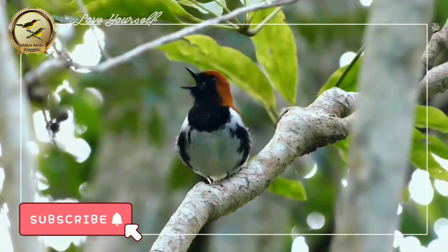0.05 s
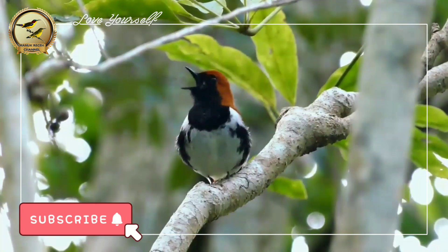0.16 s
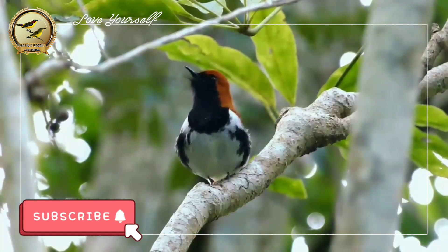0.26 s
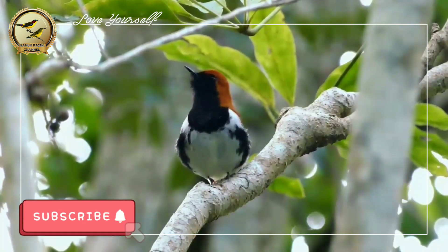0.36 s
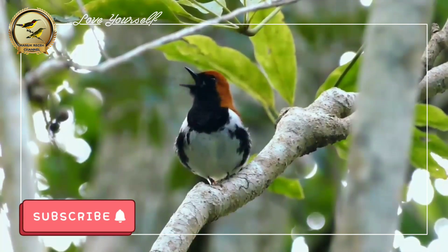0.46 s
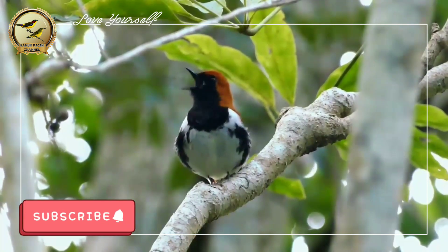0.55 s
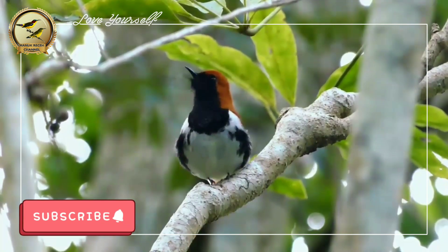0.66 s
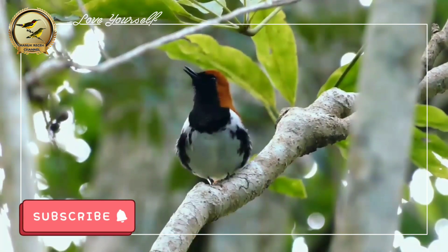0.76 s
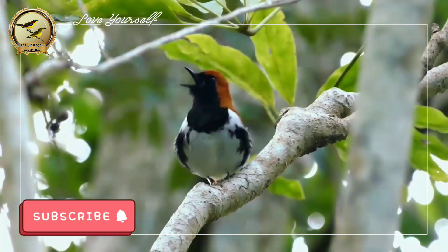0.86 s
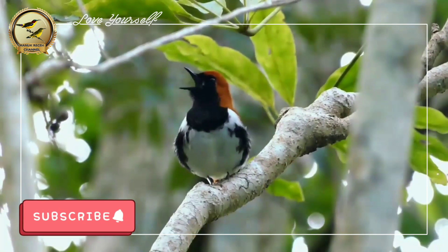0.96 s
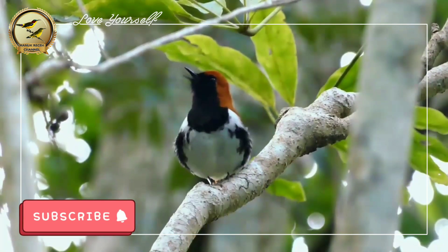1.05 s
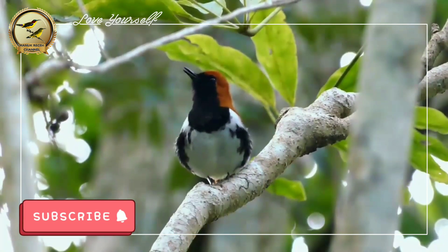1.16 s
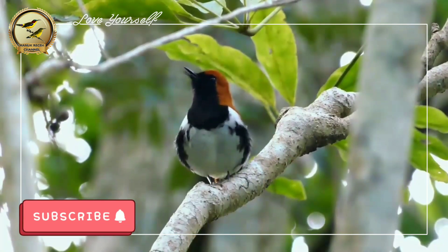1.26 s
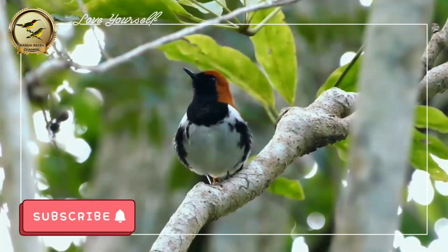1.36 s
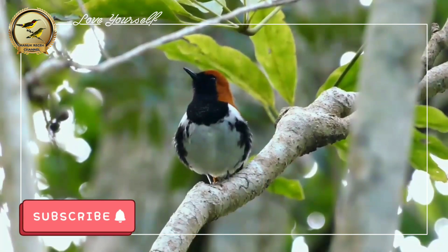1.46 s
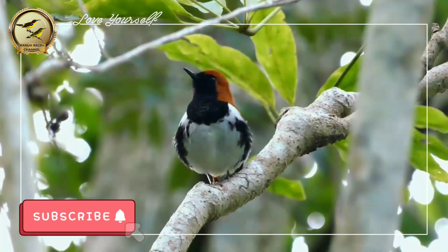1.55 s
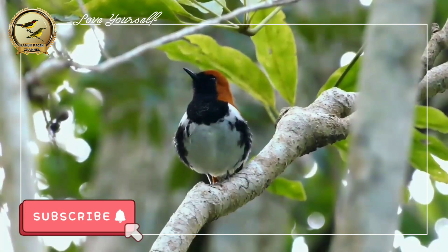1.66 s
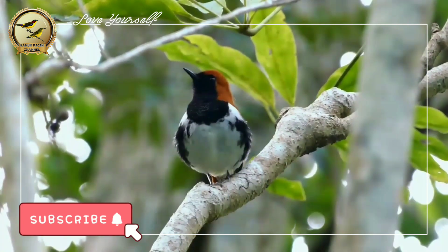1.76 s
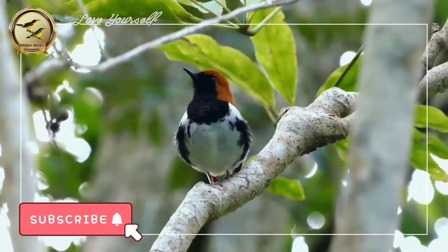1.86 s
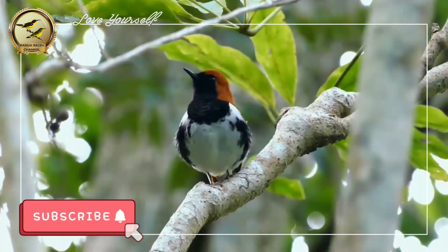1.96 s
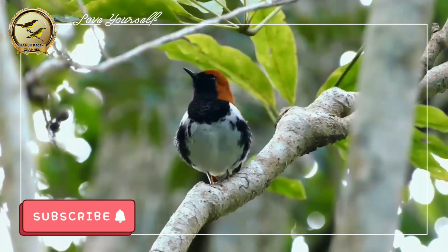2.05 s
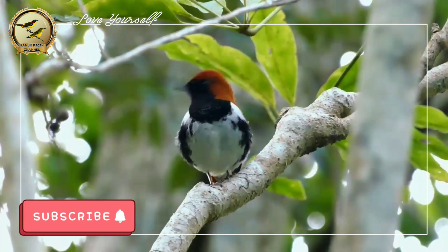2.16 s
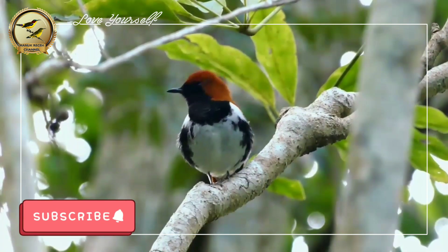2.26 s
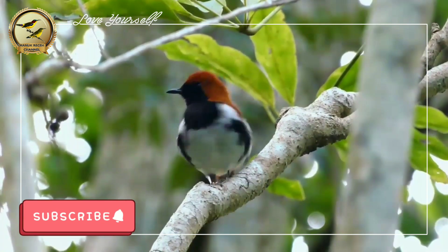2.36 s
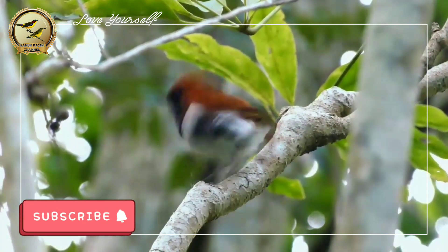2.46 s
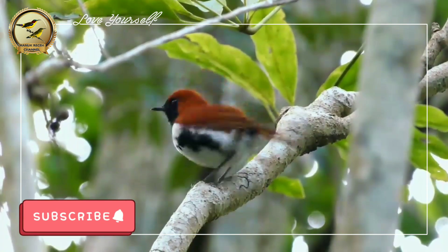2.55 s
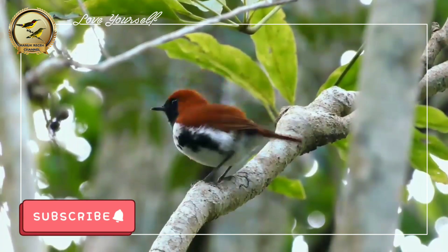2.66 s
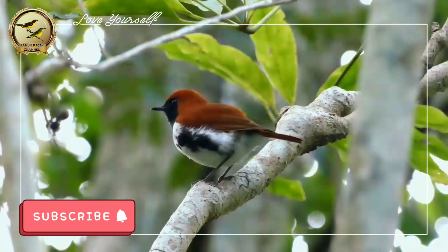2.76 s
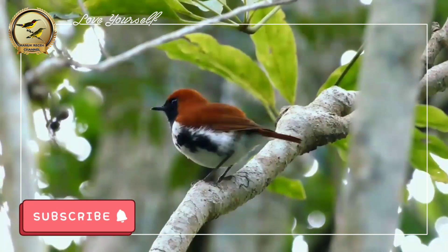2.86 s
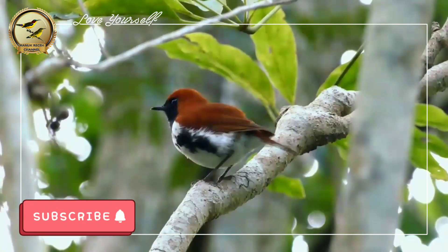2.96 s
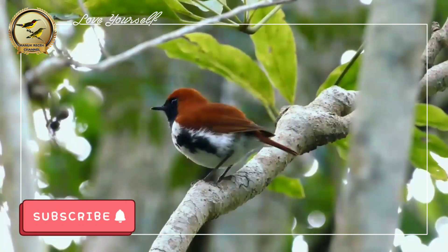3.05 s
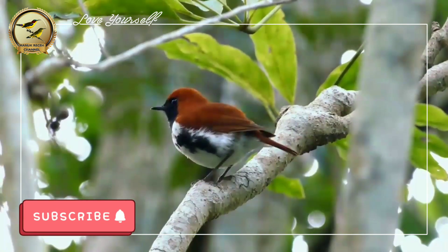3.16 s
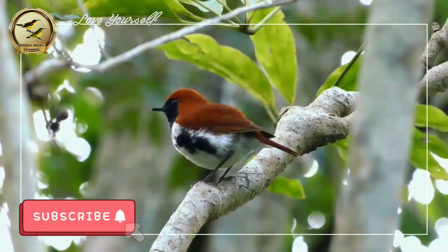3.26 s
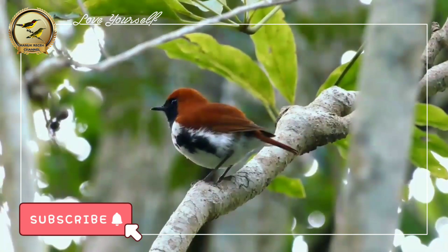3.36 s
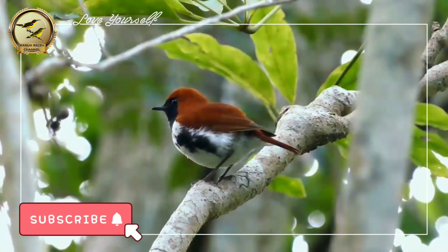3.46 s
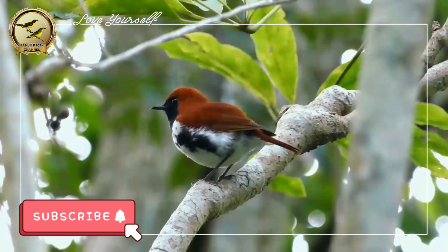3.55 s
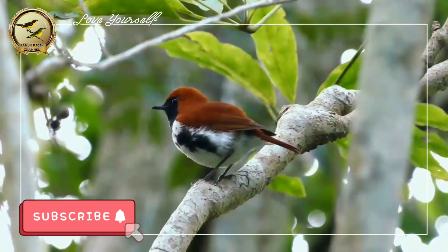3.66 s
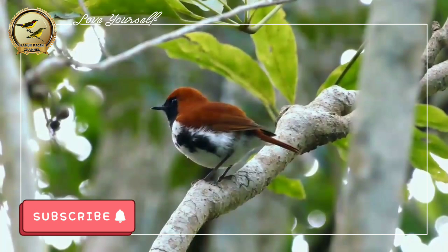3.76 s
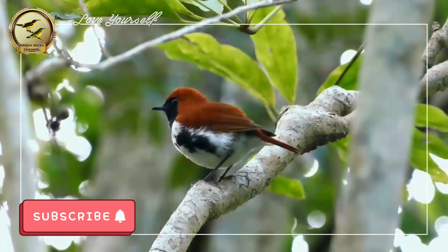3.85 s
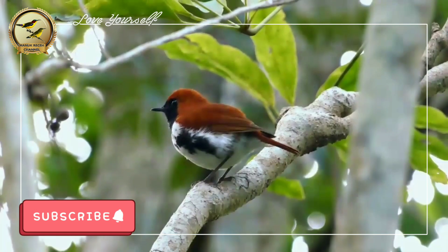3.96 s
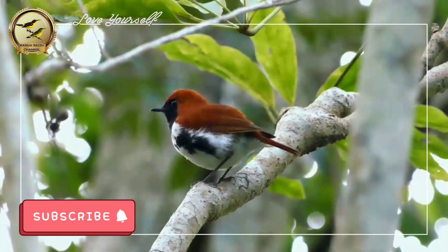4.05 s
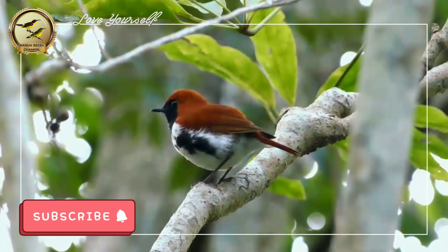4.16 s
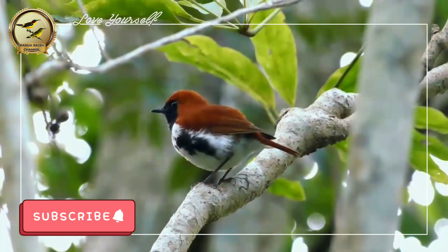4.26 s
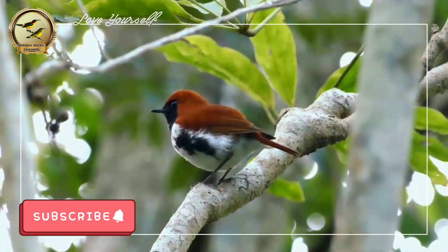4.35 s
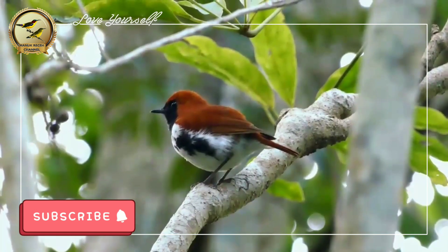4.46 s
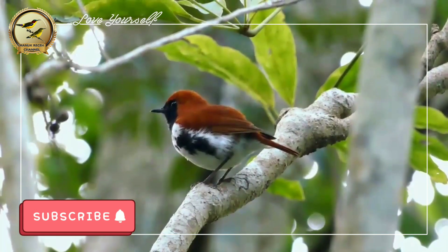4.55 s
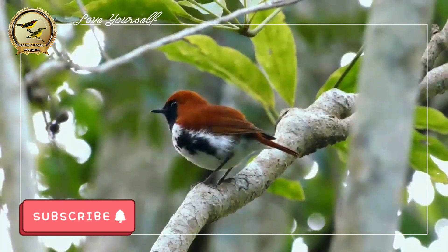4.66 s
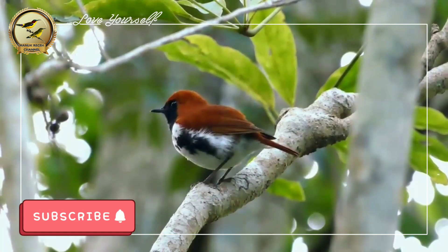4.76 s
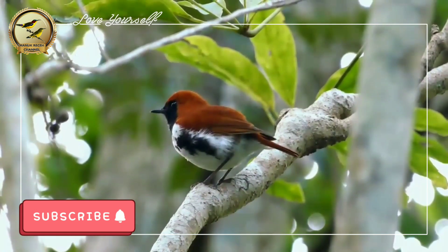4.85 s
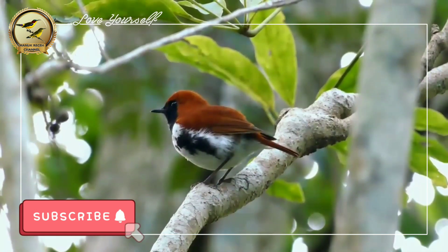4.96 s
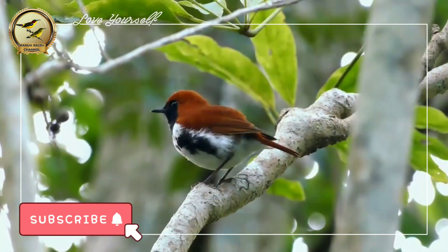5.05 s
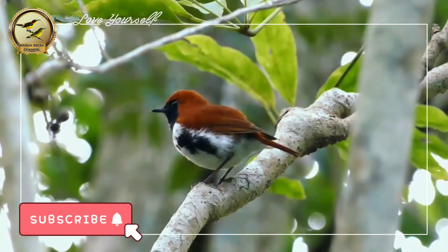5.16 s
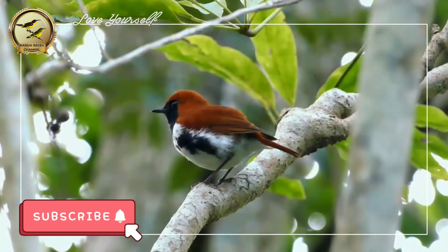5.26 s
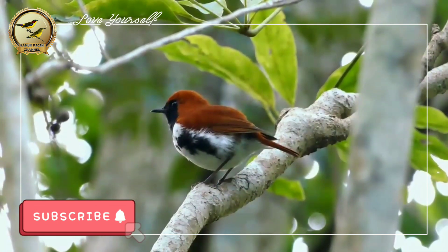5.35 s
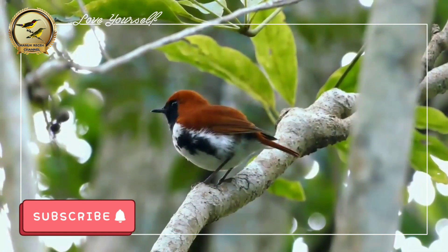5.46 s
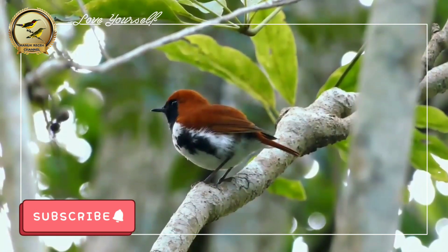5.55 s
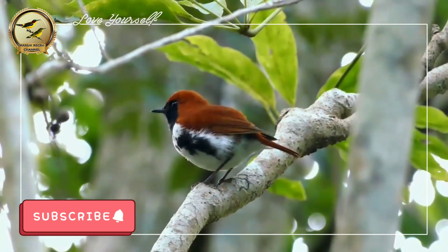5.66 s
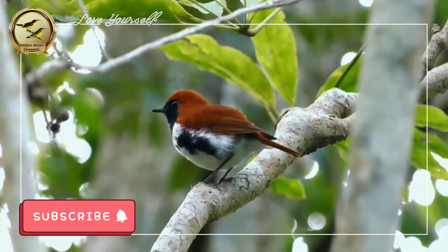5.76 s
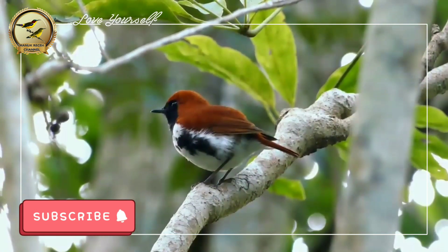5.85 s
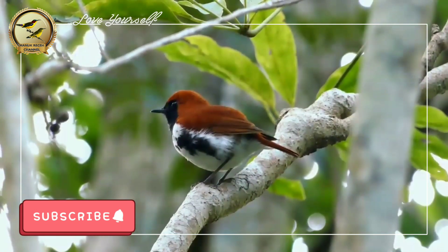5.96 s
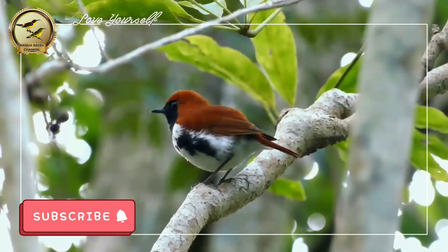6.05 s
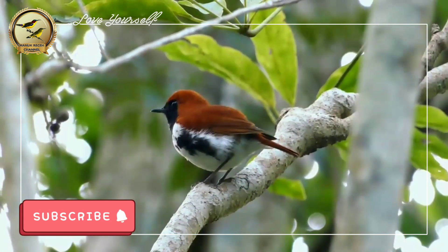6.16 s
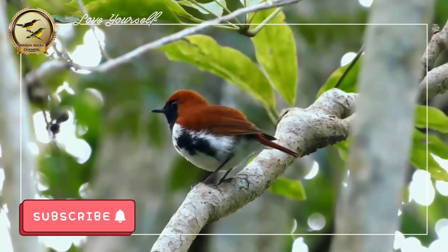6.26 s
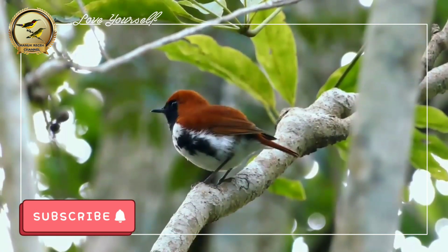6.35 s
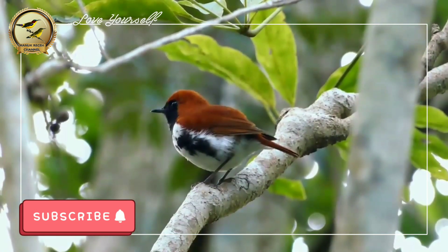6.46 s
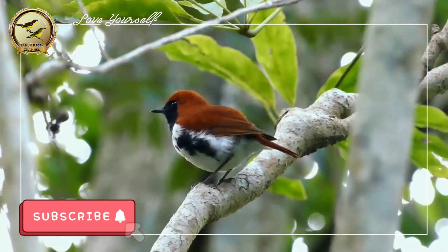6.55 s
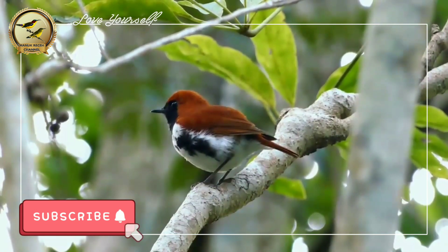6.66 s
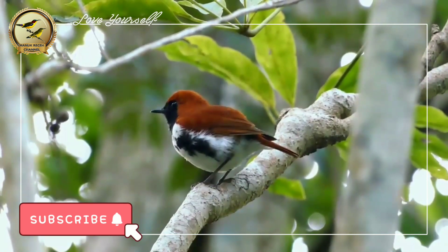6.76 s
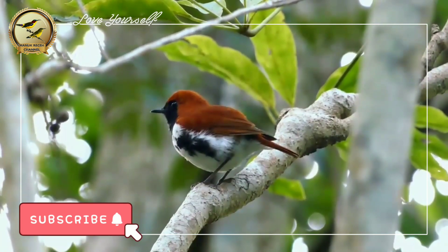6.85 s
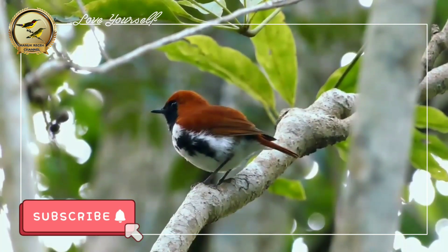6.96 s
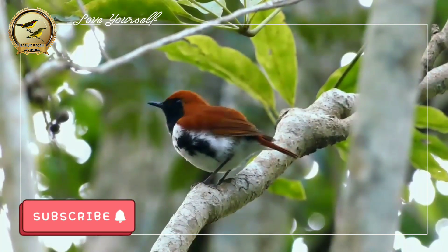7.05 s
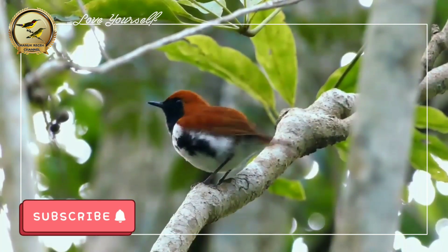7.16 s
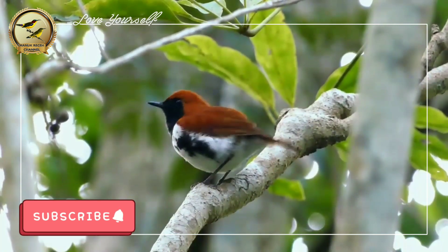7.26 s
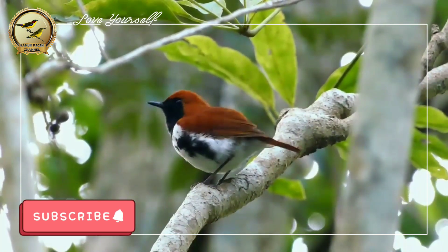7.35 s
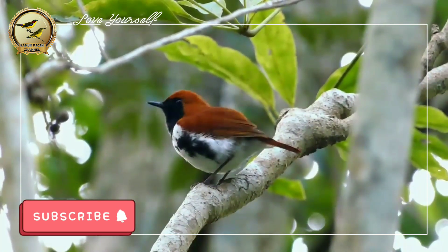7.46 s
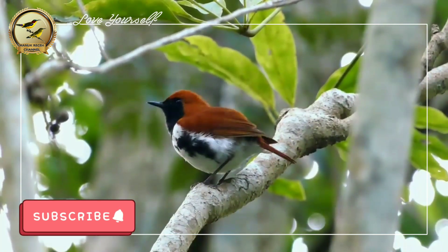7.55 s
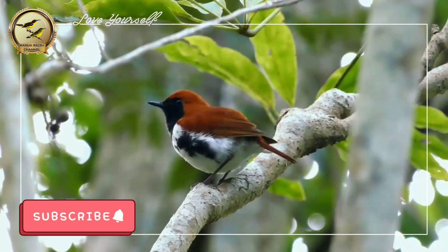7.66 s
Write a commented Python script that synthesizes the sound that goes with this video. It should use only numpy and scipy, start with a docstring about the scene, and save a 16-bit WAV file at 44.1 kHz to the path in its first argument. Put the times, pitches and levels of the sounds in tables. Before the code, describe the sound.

A close songbird sings a loud, rapid run of whistles, buzzes and trills, then a fainter bird answers through quiet forest with ticking twigs.

```python
"""A robin sings close to a stereo pair of microphones in a forest: an opening whistle and trill, then a high
whistle, a buzz, a lower whistle and a trill, three times over. A second bird answers from farther off,
blurred by the trees. Both voices are warbling tones with overtones and rasp, plus scattered echoes.
Twigs tick as cracks of noise with a woody ring; leaves rustle as crackling noise swells nearby.
Behind them lie soft forest air, made of three bands of noise, and a faint distant drone of wandering tones."""
import sys
import numpy as np
from scipy import signal
from scipy.fft import rfft, irfft, next_fast_len
from scipy.io import wavfile
from scipy.ndimage import uniform_filter1d, map_coordinates

SR = 44100
rng = np.random.default_rng(int(sys.argv[2]) if len(sys.argv) > 2 else 0)


def put_to_file(sound):
    """Save the sound as 16-bit audio at rate SR, in the file named by the first command-line argument."""
    columns = np.atleast_2d(sound).T  # one column per channel
    safe = np.clip(columns, -1, 1)
    whole_steps = np.round(safe * 32767)
    wavfile.write(sys.argv[1], SR, whole_steps.astype(np.int16))


N = 339129  # length of the scene [samples]


def near_robin():
    """The close singer: direct sound with a phase lead between the microphones, plus scatter from the trees."""
    # overtones of the near voice: (multiple of the pitch, level [dB])
    near_overtones = [(2, -28), (3, -27), (4, -43), (5, -51)]
    # how the direct song reaches the pair: (frequency [Hz], phase by which left leads right [rad])
    left_lead = [(2100, -0.058), (3600, .55), (4900, 1.75), (7200, -2.13), (11000, 1.47)]
    whistles, buzzes, trills = song()

    def sing(notes, **manner):
        """The near syrinx, in the manner of one kind of note."""
        return syrinx(notes, near_overtones, bend=1.0, throb_db=11, unsteady=0.26, **manner)

    voice = sing(whistles, scoop_s=0.0082, attack_s=0.0042, release_s=0.0032, rasp_db=-36.5)
    voice = voice + sing(buzzes, scoop_s=0.014, attack_s=0.002, release_s=0.0054, rasp_db=-33.5)
    voice = voice + sing(trills, scoop_s=0.012, attack_s=0.0049, release_s=0.0063, rasp_db=-32)

    # half the lead advances the left channel, half delays the right
    left_right = np.array([[1], [-1]])
    direct = filtered(voice, lambda hz: np.exp(0.5j * along(left_lead, hz) * left_right))
    return direct + trees(voice, near_db=-8.5, near_t60=0.17, far_db=-12.0)


def song():
    """The near robin's calls: each whistle breaks without a gap into a buzz or trill; high and low alternate."""
    # high calls: (start [s], whistle length [s], whistle pitch [Hz], glide [Hz], level [dB],
    # buzz length [s], buzz pitch [Hz], buzz scoop [0-1], buzz level [dB])
    high_calls = [(0.215, 0.11, 3643, -85, -14, 0.075, 4445, 0.07, -12),
                  (0.634, 0.097, 3635, -91, -14, 0.094, 4600, 0.1, -14),
                  (1.05, 0.11, 3604, 91, -14.5, 0.069, 4790, .16, -13)]
    # low calls: (start [s], whistle length [s], whistle pitch [Hz], glide [Hz], level [dB],
    # trill length [s], trill pitch [Hz], trill glide [Hz], trill rate [1/s], trill level [dB])
    low_calls = [(0.432, .058, 2930, 45, -12, 0.12, 2206, -200, 58, -15.5),
                 (0.847, 0.064, 2955, 148, -12, .11, 2169, -115, 81, -13),
                 (1.263, .063, 2912, 132, -15, 0.13, 2149, 65, 70, -13.5)]
    # the opening call, a swelling whistle near the pitch of its trill: columns as for the low calls
    opening_call = [(-.005, .099, 2129, -27, -13, .084, 2085, -75, 71, -12)]
    # what all notes of a kind share, by keyword: scoop [0-1] or glide_hz [Hz], warble depth_hz [Hz],
    # and first_db, middle_db, last_db: start, middle and end against the note's own level [dB]
    swelling_whistle = dict(scoop=0, depth_hz=5, first_db=-9.5, middle_db=-3, last_db=0)
    high_whistle = dict(scoop=.27, depth_hz=23, first_db=4.5, middle_db=-0.5, last_db=-3)
    low_whistle = dict(scoop=0.12, depth_hz=21, first_db=-15, middle_db=-0.5, last_db=-1.5)
    buzz_manner = dict(glide_hz=150, depth_hz=334, first_db=1, middle_db=0, last_db=-2)
    trill_manner = dict(scoop=0.017, depth_hz=131.4, first_db=-4, middle_db=-0.5, last_db=-1)
    buzzes_per_s, quivers_per_s = 182, 69  # mean warble rates of buzzes and whistles

    whistles, buzzes, trills = [], [], []
    for s, length, hz, glide_hz, db, buzz_s, buzz_hz, scoop, buzz_db in high_calls:
        whistles.append(note(s, length, hz, quivers_per_s, db, glide_hz, **high_whistle))
        buzzes.append(note(s + length, buzz_s, buzz_hz, buzzes_per_s, buzz_db, scoop=scoop, **buzz_manner))
    for manner, calls in [(swelling_whistle, opening_call), (low_whistle, low_calls)]:
        for s, length, hz, glide_hz, db, trill_s, trill_hz, trill_glide_hz, rate, trill_db in calls:
            whistles.append(note(s, length, hz, quivers_per_s, db, glide_hz, **manner))
            trills.append(note(s + length, trill_s, trill_hz, rate, trill_db, trill_glide_hz, **trill_manner))
    return whistles, buzzes, trills


def note(s, length, hz, rate, db, glide_hz, scoop, depth_hz, first_db, middle_db, last_db):
    """A note: start, length, first and last pitch, scoop, warble rate and depth, first, middle and last level."""
    first_hz, last_hz = hz - glide_hz / 2, hz + glide_hz / 2
    levels = (db + first_db, db + middle_db, db + last_db)
    return s, length, first_hz, last_hz, scoop, rate, depth_hz, *levels


def syrinx(notes, overtones, bend, scoop_s, throb_db, unsteady, attack_s, release_s, rasp_db):
    """One whistling membrane: each note scoops up to its pitch, glides and warbles."""
    # how throat and beak pass the overtones: (frequency [Hz], gain [dB])
    beak = [(4200, 8), (5000, -29.5), (6000, -10.5), (6600, -29), (7300, 0.5), (8800, -15.5), (10800, 1.5),
            (12000, 8.5), (13800, 3)]
    voice = np.zeros(N)
    for s, length, first_hz, last_hz, scoop, rate, depth_hz, *levels in notes:
        t = np.arange(int(length * SR)) / SR
        drift, waver, flicker = (wobble(speed, SR // 4)[:len(t)] for speed in (60, 380, 220))
        warble = -np.cos(2 * np.pi * np.cumsum(rate * (1 + 0.03 * drift)) / SR)
        sag = scoop * np.exp(-(t / scoop_s) ** 2)
        glide = first_hz + (last_hz - first_hz) * (t / length) ** bend
        pitch = glide * (1 - sag) + depth_hz * (warble + unsteady * waver)
        phase = 2 * np.pi * np.cumsum(pitch) / SR

        # the tone weakens whenever the membrane slackens: in the scoop and at the bottom of each warble
        slack_db = throb_db * np.tanh(depth_hz / 150) * (1 - warble) / 2 + 55 * sag
        fade = np.minimum(t / attack_s, (length - t) / release_s)
        gate = np.sin(np.pi / 2 * np.clip(fade, 0, 1)) ** 2
        level = amp(np.interp(t, [0, length / 2, length], levels) - slack_db) * gate

        upper = np.zeros(len(t))
        for k, db in overtones:
            below_limit = k * pitch < SR / 2
            upper += amp(db + along(beak, k * pitch)) * np.sin(k * phase) * below_limit
        # the weak overtones are less steady than the fundamental, and stand out in the scoop
        upper *= amp(2 * flicker + 60 * sag)
        # air forced past the membrane adds a bright rasp
        rasp = amp(rasp_db) * np.gradient(rng.standard_normal(len(t)))
        add(voice, s, np.sqrt(2) * level * (np.sin(phase) + upper + rasp))
    return voice


def trees(x, near_db, near_t60, far_db):
    """Stereo scatter: a quick one from close branches and a long one from the trunks beyond."""
    # decay of the long scatter: (frequency [Hz], t60 [s])
    forest_decay = [(500, 0.2), (2500, 0.46), (5000, 0.54), (12000, 0.63)]
    hz, t, z = signal.stft(rng.standard_normal((2, SR)), SR, nperseg=256)
    decay = amp(-60 * t / along(forest_decay, hz)[:, None])
    far = signal.istft(z * decay, SR, nperseg=256)[1][:, :SR]
    t = np.arange(SR) / SR
    far = far * (1 - np.exp(-t / 0.0099))
    # cubed noise is sparse, with a few strong reflections
    near = rng.standard_normal((2, SR)) ** 3 * amp(-60 * t / near_t60) * (1 - np.exp(-t / 0.0091))
    echo = (amp(near_db) * unit(near) + amp(far_db) * unit(far)) / np.sqrt(SR)
    return signal.fftconvolve(np.atleast_2d(x), echo, axes=1)[:, :N]


def far_bird():
    """The answer comes from the side, dulled by distance and mostly as scattered sound."""
    # slurs, and one rising overtone (2.729 s) above the slur at 2.70 s:
    # (start [s], length [s], first pitch [Hz], last pitch [Hz], level [dB], swell start to end [dB])
    answer = [(1.801, 0.11, 2860, 3790, -49, 0), (2.11, 0.025, 2660, 4400, -43, -7),
              (2.142, .107, 4970, 6790, -32, 0), (2.241, .058, 4450, 3795, -31, 9),
              (2.509, 0.04, 8700, 5560, -42.5, 9), (2.534, 0.14, 5535, 3940, -32, 8.5),
              (2.70, .118, 2694, 3974, -33.5, 7), (2.729, 0.054, 5680, 6600, -38, -12),
              (3.086, .103, 3450, 5320, -30, -2.5), (3.356, 0.092, 3380, 5900, -32, 3.5),
              (6.135, 0.051, 4390, 4080, -49, 4), (6.37, .064, 3930, 5340, -49.5, -10)]
    # overtones of the far voice: (multiple of the pitch, level [dB])
    far_overtones = [(2, -19), (3, -34)]
    voice = syrinx([burred(*row) for row in answer], far_overtones, bend=0.77, scoop_s=0.0098, throb_db=4,
                   unsteady=0.36, attack_s=0.0027, release_s=0.00043, rasp_db=-12.5)
    distance_tone = [(7500, 1.5), (10500, -3.5), (14000, -10)]  # (frequency [Hz], gain [dB])
    voice = filtered(voice, lambda hz: amp(along(distance_tone, hz)))
    lead_s = 1e-4  # the left microphone hears the direct sound first
    left_right = np.array([[1], [-1]])
    direct = filtered(voice, lambda hz: np.exp(1j * np.pi * hz * lead_s * left_right))
    return amp(1.0) * direct + trees(voice, near_db=3.5, near_t60=0.079, far_db=3.0)


def burred(s, length, first_hz, last_hz, db, swell_db):
    """A gliding tone burred by a share of its pitch; the wider it rises, the deeper it scoops in."""
    burr_per_s, burr_share, scoop_per_rise = 126, 0.046, 0.55
    scoop = scoop_per_rise * max(1 - first_hz / last_hz, 0)
    depth_hz = burr_share * (first_hz + last_hz) / 2
    levels = (db - swell_db / 2, db, db + swell_db / 2)
    return s, length, first_hz, last_hz, scoop, burr_per_s, depth_hz, *levels


def twigs():
    """Each snap nearby is a bright crack of noise and a brief woody knock of decaying modes."""
    # the clearest snaps, levels before the trims below:
    # (time [s], crack level [dB], knock level [dB], left over right [dB])
    snaps = [(3.1617, -27.5, -38.5, -1.0), (4.0519, -26.5, -45, -6), (4.0842, -26, -39, -1),
             (4.2197, -24.5, -34.5, -2), (4.3804, -33, -34.5, 0), (4.5132, -39.5, -38, -1),
             (4.6081, -40, -35, 1), (4.6279, -30, -39, -1.5), (4.668, -23, -39.5, 2),
             (4.6897, -27, -43, -3), (4.7312, -23, -44, 1.0), (4.7502, -27.5, -55, -2.5),
             (5.1444, -29, -26.5, 1), (5.6124, -27.5, -42, -1.5), (5.6297, -27.5, -42, -1.0),
             (7.4597, -31, -44, -3)]
    # mean ring of a twig, before its size and unevenness: (frequency [Hz], level [dB], t60 [s])
    wood_ring = [(625, -8.5, 0.016), (825, 1.5, 0.02), (1313, 2, 0.016), (2030, -3.5, 0.009)]
    # relative tone of the crack: (frequency [Hz], gain [dB])
    crack_tone = [(500, -19.5), (2000, 0.5), (5000, -3.5), (10000, 1), (15000, 3)]
    crack_trim_db, knock_trim_db = 1.5, 3.5

    cracks, knocks = np.zeros((2, N)), np.zeros((2, N))
    t = np.arange(SR // 10) / SR
    burst = amp(-60 * t / 0.019) * (1 - np.exp(-t / 0.0008))
    for s, db, knock_db, pan_db in list(snaps) + faint_ticks(count=5):
        sides = amp(np.array([[pan_db], [-pan_db]]) / 2)
        # noise common to both microphones, plus noise of each one's own
        grit = rng.standard_normal(len(t)) + 2.08 * rng.standard_normal((2, len(t)))
        add(cracks, s, sides * amp(db + crack_trim_db) * grit * burst)
        pitch_factor = np.exp(0.091 * rng.standard_normal())  # every twig has its own size
        ring = np.zeros(len(t))
        for hz, level_db, t60 in wood_ring:
            decay = amp(level_db + rng.normal(0, 0.94) - 60 * t / t60)
            ring += decay * np.sin(2 * np.pi * hz * pitch_factor * t)
        # the knock follows the crack by about a millisecond
        add(knocks, s + 0.00107, sides * amp(knock_db + knock_trim_db) * ring)
    dry_snaps = filtered(cracks, lambda hz: amp(along(crack_tone, hz))) + knocks
    return dry_snaps + trees(dry_snaps, near_db=-5.5, near_t60=0.037, far_db=-7)


def faint_ticks(count):
    """Small snaps, one at a random moment in each equal slice of a stretch, each from its own side."""
    from_s, to_s = 5.3, 7.0
    crack_db, spread_db, knock_db = -38, 1.5, -49  # before the trims in twigs()
    ticks = []
    for k, (size, side) in enumerate(rng.standard_normal((count, 2))):
        s = from_s + (to_s - from_s) * (k + rng.random()) / count
        ticks.append((s, crack_db + spread_db * size, knock_db, 2 * side))
    return ticks


def leaves():
    """Short swells of leaves rubbing together: noise whose gain crackles at random."""
    # leaves brushing: (time [s], width [s], level [dB])
    brushes = [(3.92, 0.023, -37), (3.998, 0.016, -37.5), (4.24, 0.15, -40.5), (4.63, 0.04, -42.5),
               (4.748, 0.012, -45), (5.13, 0.045, -32.5), (5.5, 0.15, -50)]
    # relative spectrum: (frequency [Hz], density [dB per Hz])
    leaf_spectrum = [(150, -25), (500, 6), (1500, 9.5), (3500, 8.5), (7000, 4), (11000, 7.5), (15000, 2)]
    swell = sum(amp(db) * bump(s, width) for s, width, db in brushes)
    crackle = amp(3.2 * wobble(610, N))
    return swell * unit(crackle * rush(leaf_spectrum, patchy_db=1))


def forest_air():
    """Rumble, the wash of the canopy and a fluttering treble hiss: three bands of drifting noise."""
    # relative spectra: (frequency [Hz], density [dB per Hz])
    rumble_spectrum = [(13, -25), (22, -8), (54, 0.5), (102, -2.5), (119, -1.5), (200, -8), (260, -41),
                       (440, -120)]
    air_spectrum = [(88, -58), (150, -3), (214, -1.5), (275, -0.5), (469, -2.5), (643, -0.5), (728, -4.5),
                    (945, -4.5), (1190, -7), (1800, -10), (2040, -11.5), (3580, -20), (4000, -56),
                    (5200, -56), (8800, -120)]
    hiss_spectrum = [(700, -25), (1800, 1), (3500, 2), (6000, 0), (9000, -1.5), (14000, -2.5)]
    # course of each band, before its trim: (time [s], level [dB])
    rumble_course = [(0.15, -59.5), (1.87, -56), (2.43, -51), (2.49, -53), (7.54, -54.5), (7.6, -53)]
    air_course = [(0.1, -48), (0.27, -56.5), (0.63, -56.5), (1.32, -57.5), (1.43, -55), (2.98, -51.5),
                  (3.48, -49), (4.01, -46.5), (4.33, -48.5), (5.34, -43), (6.08, -46.5), (7.69, -47)]
    hiss_course = [(1.55, -60), (1.67, -57.5), (2.59, -52.5), (2.71, -48.5), (2.9, -52), (3.69, -51.5),
                   (4.15, -48.5), (4.39, -55), (5.07, -50.5), (5.26, -48), (6.24, -52.5), (7.69, -53)]
    rumble_trim_db, air_trim_db, hiss_trim_db = 0.5, 1.5, 7

    t = np.arange(N) / SR
    courses = (rumble_course, air_course, hiss_course)
    rumble_db, air_db, hiss_db = (np.interp(t, *np.transpose(course)) for course in courses)
    rumble = amp(rumble_db + rumble_trim_db) * rush(rumble_spectrum, patchy_db=0.5)
    wash = amp(air_db + air_trim_db) * rush(air_spectrum, patchy_db=1.5)
    flutter_db = 1.1 * wobble(50, N) + 1.3 * wobble(400, N)
    hiss = amp(hiss_db + flutter_db + hiss_trim_db) * rush(hiss_spectrum, patchy_db=2.66)
    return rumble + wash + hiss


def distant_drone():
    """Faint wandering tones of far machinery, growing clearer after the song, and hums that swell and fade."""
    # lasting tones, levels once clear: (mean frequency [Hz], mean level [dB], pitch wander [Hz])
    drone_tones = [(59.3, -59.5, 1.04), (94, -65, 1), (663, -63, 20), (945, -61.5, 11.65), (1777, -64, 7.2)]
    # passing hums: (time [s], width [s], mean frequency [Hz], peak level [dB])
    hums = [(2.35, 0.19, 144.2, -53), (2.32, 0.14, 96, -55.5), (3.05, 0.095, 97.2, -50.5),
            (7.0, 0.21, 96, -56), (7.45, 0.3, 387, -56.5), (7.6, 0.18, 660, -52.5)]

    def tone(hz, wander_hz):
        """A sine of rms 1 with wandering pitch."""
        return np.sqrt(2) * np.sin(2 * np.pi * np.cumsum(hz + wander_hz * wobble(24, N)) / SR)

    steady = sum(amp(db + 2.3 * wobble(7.1, N)) * tone(hz, wander_hz) for hz, db, wander_hz in drone_tones)
    swells = sum(amp(db) * bump(s, width) * tone(hz, 0.0118 * hz) for s, width, hz, db in hums)
    clearing_db = np.interp(np.arange(N) / SR, [1.5, 3.4], [-8, 0])
    return amp(clearing_db) * steady + swells


def rush(spectrum, patchy_db):
    """Stereo noise of rms 1 with patches of random gain and a set likeness between the microphones."""
    # likeness of left and right: (frequency [Hz], correlation [0-1])
    likeness = [(60, 0.52), (150, 0.27), (380, 0.53), (950, 0.52), (2380, 0.069), (5980, 0.055),
                (15000, 0.01)]
    z = signal.stft(rng.standard_normal((2, N)), nperseg=512)[2]
    field = uniform_filter1d(rng.standard_normal(z.shape[1:]), size=6, axis=0)
    field = uniform_filter1d(field, size=12, axis=1)
    pair = signal.istft(z * amp(patchy_db * unit(field)), nperseg=512)[1][:, :N]

    def mid_side_response(hz):
        """The spectrum, shared between middle and side to give the likeness."""
        turn = np.arccos(np.clip(along(likeness, hz), -1, 1)) / 2
        return amp(along(spectrum, hz)) * np.array([np.cos(turn), np.sin(turn)])

    mid, side = filtered(pair, mid_side_response)
    return unit(np.array([mid + side, mid - side]))


def amp(db):
    """Decibels to gain."""
    return 10 ** (np.asarray(db) / 20)


def unit(x):
    """Scaled to rms 1."""
    return x / np.sqrt(np.mean(x ** 2) + 1e-20)


def bump(s, width):
    """A bell-shaped swell of peak 1 at time s."""
    t = np.arange(N) / SR
    return np.exp(-((t - s) / width) ** 2 / 2)


def along(points, hz):
    """(Hz, value) points on a log axis."""
    f, v = np.transpose(points)
    return np.interp(np.log(hz + 1), np.log(f + 1), v)


def wobble(rate, size):
    """A smooth random curve, rate knots a second."""
    knots = rng.standard_normal(int(size * rate / SR) + 4)
    # a spline through the knots at about ten points each, then straight lines between those
    coarse = np.linspace(0, size, int(10 * size * rate / SR) + 2)
    return np.interp(np.arange(size), coarse, map_coordinates(knots, [coarse * rate / SR]))


def filtered(x, response):
    """x times a response of frequency."""
    m = next_fast_len(N + SR // 2)
    return irfft(rfft(x, m) * response(np.fft.rfftfreq(m, 1 / SR)), m)[..., :N]


def add(track, s, sound):
    """Mix a sound into a track at time s, cut off at the track's ends."""
    i = round(s * SR)
    a, b = max(i, 0), min(i + sound.shape[-1], N)
    track[..., a:b] += sound[..., a - i:b - i]


def scene():
    """Both birds, the undergrowth, the air and the drone."""
    return near_robin() + far_bird() + twigs() + leaves() + forest_air() + distant_drone()


def record(dry):
    """The recorder cuts off very steeply above its band limit."""
    top_hz = 14480
    return filtered(dry, lambda hz: 1 / np.sqrt(1 + (hz / top_hz) ** 300))


dry = scene()
out = record(dry)
put_to_file(out)
```